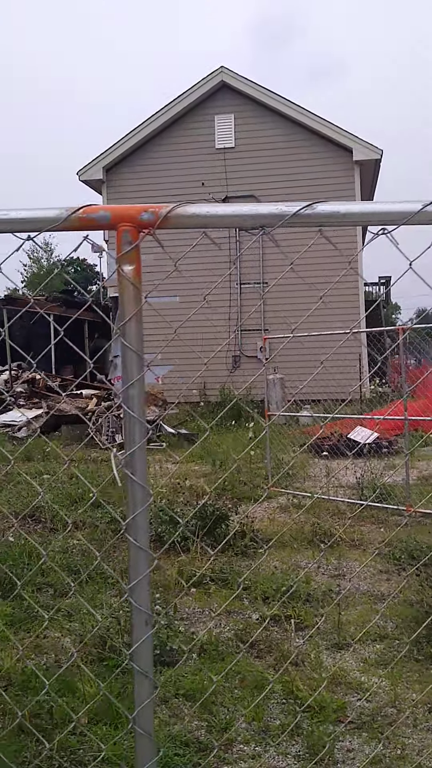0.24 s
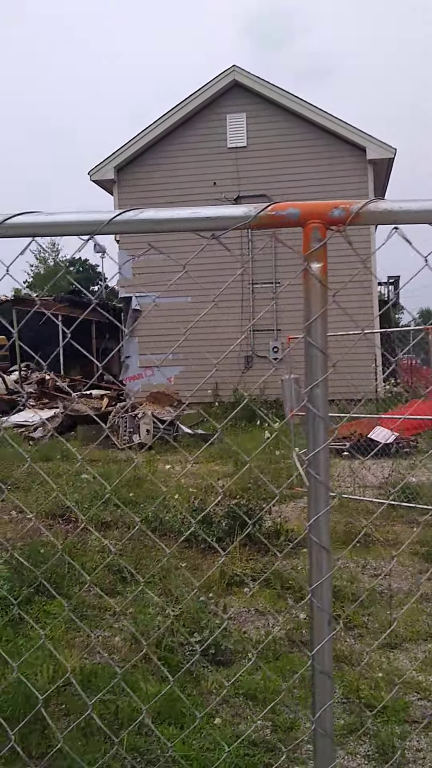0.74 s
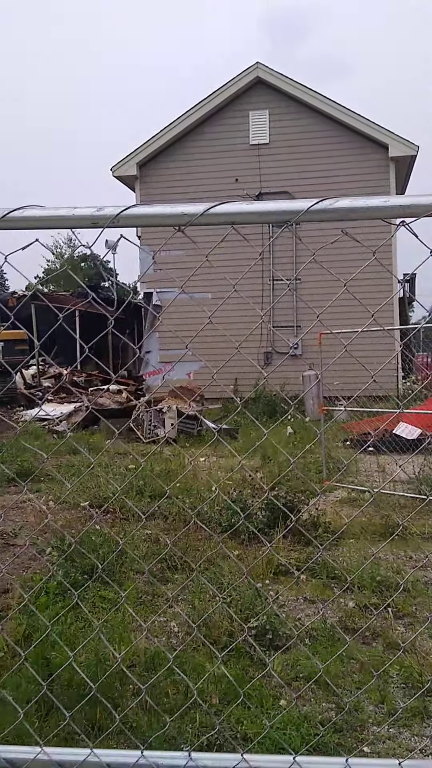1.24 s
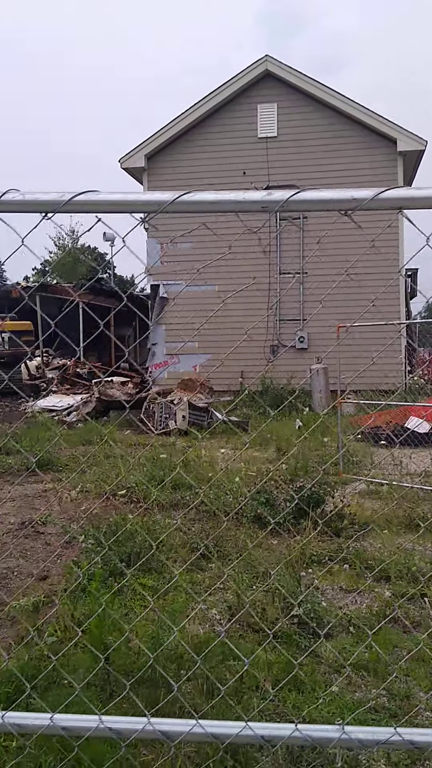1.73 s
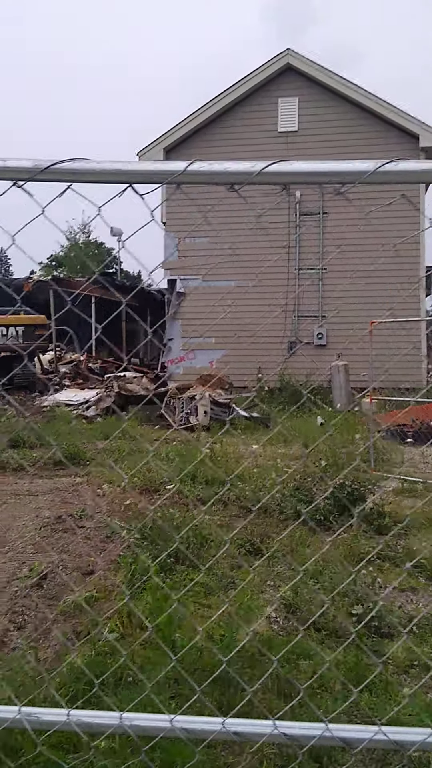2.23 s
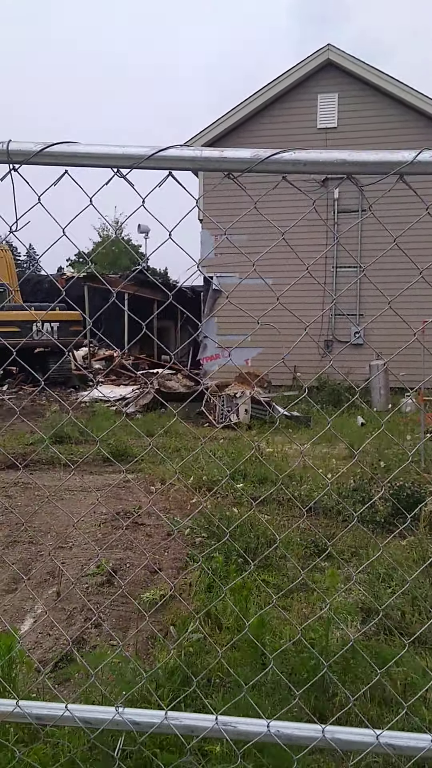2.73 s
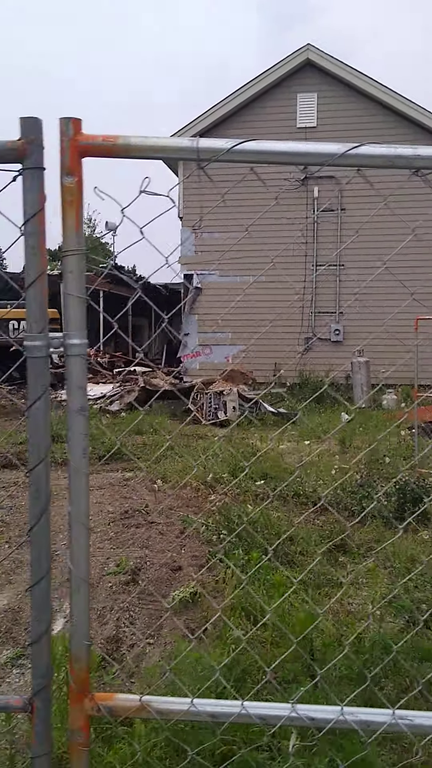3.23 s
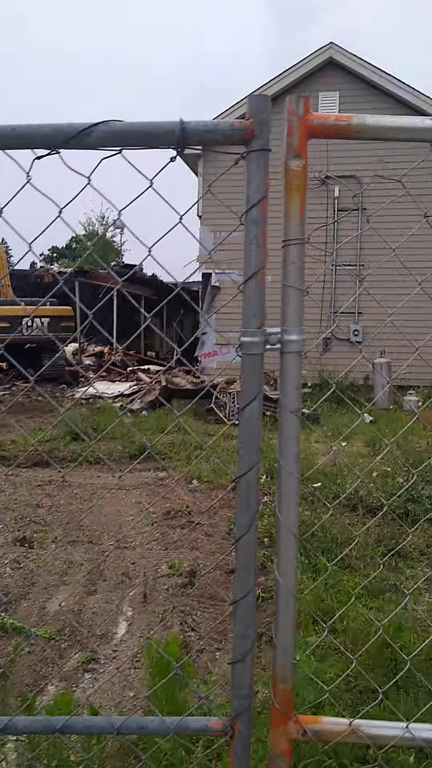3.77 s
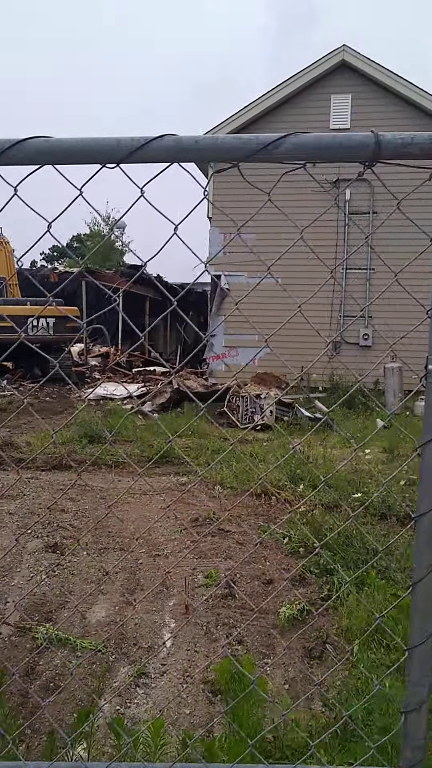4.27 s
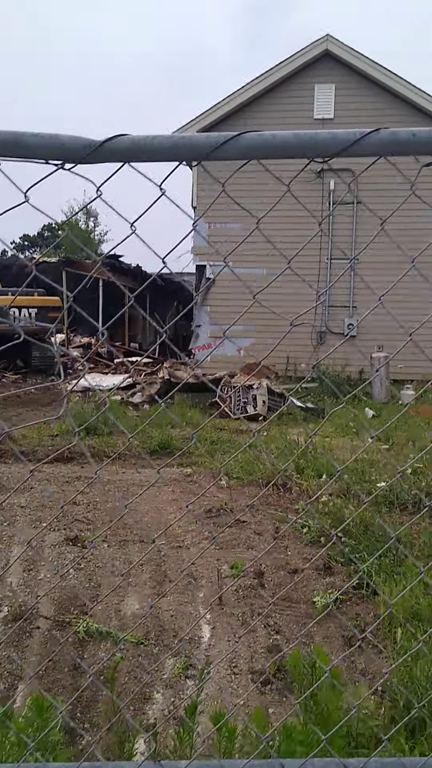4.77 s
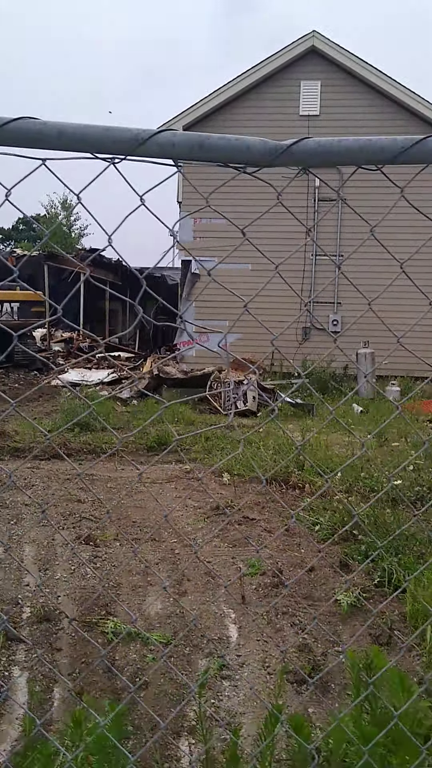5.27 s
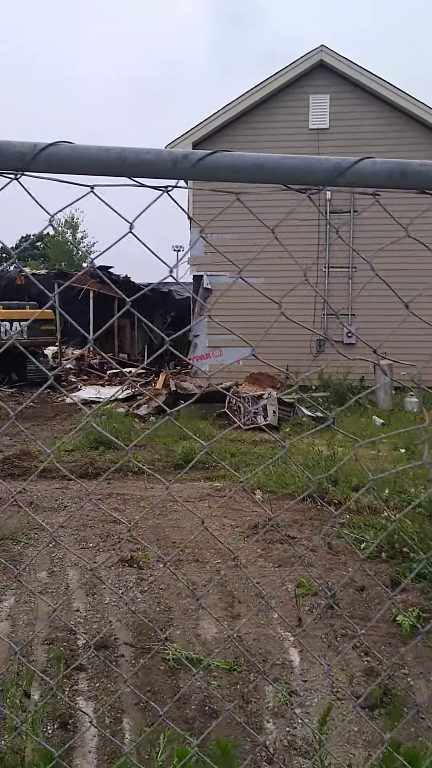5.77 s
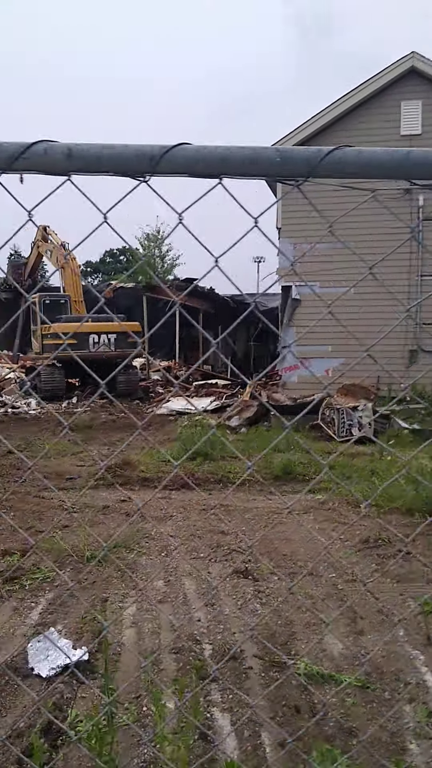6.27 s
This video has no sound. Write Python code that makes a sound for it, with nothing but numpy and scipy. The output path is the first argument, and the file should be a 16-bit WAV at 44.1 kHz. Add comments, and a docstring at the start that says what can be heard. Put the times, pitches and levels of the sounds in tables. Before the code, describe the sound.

Outdoors across a lot, a low diesel hums steadily while a wooden house is torn apart. Light metal clinks and knocks come first, then a dense splintering crash, a second heavy burst with deep thuds, and shorter cracks and clatters. A hydraulic whine and faint squeals enter later, before a final crunch. Handheld stereo microphone at a distance, with short echoes.

```python
"""Demolition of a wooden house

An excavator pulls down a house across an open lot. Rubble slides as dense trains of tiny snaps, boards
tear in bursts of snaps filtered by random resonances, timbers thud and the steel bucket knocks as decaying
modes, and light metal taps beat. Decaying echoes follow them. Beneath runs the diesel as a harmonic series,
with a thin hydraulic whine, squeals, a fluttering hiss on the right and a wash of distant machinery."""
import sys
import numpy as np
from scipy import signal
from scipy.fft import rfft, irfft, next_fast_len
from scipy.io import wavfile
from scipy.ndimage import uniform_filter1d

SR = 44100
rng = np.random.default_rng(int(sys.argv[2]) if len(sys.argv) > 2 else 0)


def store_wav(level_fs):
    """Save 16-bit WAV to argv[1]."""
    pcm = np.round(np.clip(np.atleast_2d(level_fs), -1, 1) * 32767)
    wavfile.write(sys.argv[1], SR, pcm.T.astype(np.int16))


N = 286738
TIME = np.arange(N) / SR
PADDED = next_fast_len(N, True)


def amp(db):
    """Decibel law: level to amplitude ratio."""
    return 10 ** (np.asarray(db) / 20)


def unit(x):
    """Normalisation to an rms of 1."""
    return x / np.sqrt(np.mean(x ** 2) + 1e-20)


def read(points, hz):
    """Linear interpolation of a table on a log-frequency axis."""
    f, value = np.transpose(points)
    return np.interp(np.log(hz + 1), np.log(f + 1), value)


def curves(rows):
    """Linear interpolation in time of each column of a table."""
    s, *columns = np.transpose(rows)
    return [np.interp(TIME, s, c) for c in columns]


def add(mix, s, sound):
    """Superposition: a sound joins the mix at time s."""
    part = mix[..., max(round(s * SR), 0):][..., :sound.shape[-1]]
    part += sound[..., :part.shape[-1]]


def bins(size):
    """Frequencies of a discrete real spectrum."""
    return np.fft.rfftfreq(size, 1 / SR)


def drift(rate_hz, size=8192):
    """Low-pass noise: a random fluctuation of rms 1, mostly slower than rate_hz."""
    hz = np.fft.rfftfreq(size, N / SR / size)
    lowpass = 1 / (1 + (hz / rate_hz) ** 4)
    slow = unit(irfft(rfft(rng.standard_normal(size)) * lowpass))
    return np.interp(TIME, np.linspace(0, N / SR, size), slow)


def noise(spectrum, channels=1):
    """Spectral shaping: Gaussian noise of rms 1 coloured by a table."""
    white = rfft(rng.standard_normal((channels, PADDED)))
    return unit(irfft(white * amp(read(spectrum, bins(PADDED))), PADDED)[:, :N])


def causal(db):
    """Minimum phase: the response of a body that rings only after it is struck."""
    log_gain = np.log(amp(np.maximum(db, -100)))
    circle = np.concatenate([log_gain, log_gain[-2:0:-1]])
    return np.exp(signal.hilbert(circle).conj())[:len(db)]


def band_level(gain, lo_hz, hi_hz):
    """Band power: level in dB that a filter leaves of unit noise between two frequencies."""
    hz = bins(2 * len(gain) - 2)
    inside = (hz > lo_hz) * (hz < hi_hz)
    return 10 * np.log10(np.mean(abs(gain) ** 2 * inside) + 1e-20)


def snaps(size, per_s, spread_db):
    """Poisson impulses: two trains of tiny fibre snaps, a few much larger than the rest."""
    height = amp(spread_db * np.minimum(rng.exponential(1, (2, size)), 4))
    sign = rng.choice([-1, 1], (2, size))
    return height * sign * (rng.random((2, size)) < per_s / SR)


# likeness of the two ports: f/Hz, correlation [0 to 1]
COHERENCE = [(100, 1), (400, .92), (900, .84), (2000, .84), (4000, .58), (7000, .42), (13000, .2)]
# spectral balance of the ports: f/Hz, left minus right level/dB
BALANCE = [(400, 0.5), (1000, 3.5), (1700, -4), (2800, -0.5), (3800, 6.5), (5000, 5.5), (8000, 2.5),
           (10000, 7.5), (13000, 9.5)]
LEFT_LEAD_S = .00009


def ports(pair):
    """Interchannel coherence: two signals share their bass; the left port leads slightly and is tilted."""
    hz, (a, b) = bins(PADDED), rfft(pair, PADDED)
    same = np.clip(read(COHERENCE, hz), 0, 1)
    shared, apart = a * np.sqrt((1 + same) / 2), b * np.sqrt((1 - same) / 2)
    lean = amp(read(BALANCE, hz) / 2)
    lag = np.exp(-2j * np.pi * hz * LEFT_LEAD_S)
    return irfft([(shared + apart) * lean, (shared - apart) / lean * lag], PADDED)[:, :N]


# slides of rubble under the bucket: start t/s, length t/s, starting level/dB (relative),
# treble re that level/dB (relative)
SLIDES = [(0, 0.0084, -42, -33), (0.12, 0.26, -49, -52), (0.568, 0.13, -33.5, -7), (0.645, 0.29, -34, -7),
          (1.513, 0.013, -37.5, 0), (1.593, 0.4, -45.5, 0), (1.866, 0.056, -35, -5),
          (2.521, 0.087, -40, -11.5), (2.786, 0.084, -40.5, -16), (3.085, 0.2, -38, -24),
          (3.358, 0.078, -39, -13.5), (3.458, 0.13, -44, -6.5), (3.812, 0.015, -36.5, -12),
          (3.973, 0.14, -40, -8), (4.741, 0.05, -40, -27), (5.24, 0.056, -46.5, -45),
          (5.755, 0.12, -44, -14.5), (5.879, 0.037, -38, -4), (6.041, .12, -48.5, -14.5)]
# a slide starts quickly, slackens, then stops; dull scraps trickle on
SLIDE_ATTACK_S, SLIDE_SAG_DB_PER_S, SLIDE_STOP_DB_PER_S = 0.015, 10, 135
TRICKLE_DB, TRICKLE_DB_PER_S = -12.5, 37.5
DULLING_DB_PER_S = 41  # the splintering stops sooner than the tumbling


def slides():
    """Energy envelope: level and relative treble in dB through attack, sagging hold, release and trickle."""
    body, treble = np.full((2, N), 1e-10)
    t = TIME[:SR * 3 // 2]
    for start, length, db, treble_db in SLIDES:
        after = np.maximum(t - length, 0)
        held = np.minimum(t / SLIDE_ATTACK_S, 1) * amp(db - SLIDE_SAG_DB_PER_S * (t - after))
        rush = held * amp(-SLIDE_STOP_DB_PER_S * after)
        trickle = held * amp(TRICKLE_DB - TRICKLE_DB_PER_S * after)
        add(body, start, rush ** 2 + trickle ** 2)
        add(treble, start, (rush * amp(treble_db - DULLING_DB_PER_S * after)) ** 2)
    return 10 * np.log10(body), 10 * np.log10(treble / body)


# spectrum of breaking wood, for fragments and boards: f/Hz, relative level/dB per Hz
WOOD = [(150, -47), (280, -30.5), (450, -18), (560, -12), (660, -30.5), (900, -4), (1400, 2.5), (2100, 5.5),
        (3000, 2), (4200, -2.5), (6500, -9.5), (10400, -34), (15500, -60.5)]
USUAL_SLIDE_DB = -37  # slide level from which the bass of fragments and boards is reckoned


def crumble(db, treble, level_db=-5.0, treble_db=-1.0, patch_db=6, clump_db=0.8,
            lumps_db=-15, lumps_per_db=3.0):
    """Granular noise: countless fragments fall in clumps, in patches of varied pitch; big slides add bass."""
    hz, _, z = signal.stft(snaps(N, per_s=5000, spread_db=3.5), SR, nperseg=512)
    patches = uniform_filter1d(rng.standard_normal(z.shape[1:]), size=3, axis=0)
    patches = unit(uniform_filter1d(patches, size=5, axis=1))
    z = z * amp(read(WOOD, hz)[:, None] + patch_db * np.minimum(patches, 2))
    # high-pass masks split the fragments into four size bands
    small, fine, finest = (1 / (1 + (edge_hz / (hz[:, None] + 1)) ** 8) for edge_hz in (950, 4600, 10000))
    masks = (1 - small, small - fine, fine - finest, finest)
    lumps, chunks, grit, dust = (
        unit(signal.istft(z * mask, SR, nperseg=512)[1][:, :N]) for mask in masks)
    deep = amp(lumps_db + lumps_per_db * (db - USUAL_SLIDE_DB))
    bright = amp(treble + treble_db)
    # the top octave only escapes from exposed rubble
    sizes = deep * lumps + chunks + bright * (grit + 1.6 * np.minimum(bright, 1) * dust)
    return amp(db + level_db + clump_db * drift(23.0)) * sizes


# boards breaking loudly: t/s, nominal level/dB, nominal splinter treble re level/dB
CRACKS = [(.592, -30.5, -29), (.615, -29.5, -26), (.625, -28.5, -18), (.6518, -25.5, 2), (.662, -23, -21),
          (.684, -29.5, 3.5), (.697, -32, -18), (.745, -26, 1), (.7642, -31, 3.5), (.779, -26, -12),
          (.8179, -29, -11), (.8664, -26, 0), (.905, -30.5, -22), (.977, -27.5, -9), (1.5173, -32.5, 3),
          (1.531, -23, -14), (1.556, -27.5, -22), (1.6182, -37.5, 9), (1.7035, -30.5, 0.5), (1.765, -34, 3),
          (1.8148, -37, 9), (1.866, -26, 2.5), (1.8873, -23.5, 2.5), (1.9186, -24.5, -9), (1.94, -33, -16),
          (1.968, -34, -21), (1.994, -29.5, -10), (2.012, -30.5, -33), (2.365, -31, -67), (2.42, -38, -24),
          (2.5353, -24.5, -11), (2.5626, -25.5, -23), (2.718, -31.5, -36), (2.7702, -28, -10),
          (2.8126, -31, -10), (2.9879, -34, -3.5), (3.116, -30.5, -8.5), (3.136, -29.5, -14),
          (3.163, -22.5, -7), (3.195, -36, -9), (3.25, -32.5, -12), (3.368, -36, -11), (3.41, -31.5, -12),
          (3.4715, -24.5, -1.5), (3.487, -27, -2.5), (3.5105, -29.5, -3.5), (3.538, -28, -4.5),
          (3.836, -31.5, -11), (3.91, -24.5, -3.5), (3.961, -31.5, -5), (3.984, -29.5, -6),
          (4.0093, -24, -0.5), (4.035, -29.5, -23), (4.098, -28.5, -6), (4.39, -33.5, -36.5),
          (4.564, -26.5, -7.5), (4.785, -42, -33), (5.8, -32, -36), (5.848, -50, 8.5), (5.877, -27.5, -18),
          (5.897, -22, -10), (5.9317, -25, -17), (6.008, -32, -15)]
LOW_END_DB, LOW_END_PER_DB = -12.5, 3.5  # the bigger the slide, the deeper its boards
FRACTURE_S, SMALL_FRACTURE_S = 0.011, 0.0047  # decay time of the tearing of a board and a lath


def cracks(rows, slide_db, fracture_s, ring_db, level_db=0, treble_db=0, rise_s=0.003, size=8192):
    """Source and filter: a dying run of snaps excites each board's random resonances; buried ones are dull."""
    out, hz, t = np.zeros((2, N)), bins(size), np.arange(size) / SR
    wood = read(WOOD, hz)
    wood = wood - band_level(amp(wood), 1000, 4500)
    usual_treble = band_level(amp(wood), 5000, 15000)
    usual_low = band_level(amp(wood), 400, 1000)
    # how strongly each frequency follows the treble and the bass settings
    treble_part = read([(3400, 0.0017), (6500, 0.67), (14000, 2.65)], hz)
    low_part = read([(850, 0.48), (1400, 0.011)], hz)
    force = np.exp(-t / fracture_s) * (1 - np.exp(-t / rise_s))
    for s, db, treble in rows:
        slide_peak = slide_db[round(s * SR):][:size // 4].max()
        low = LOW_END_DB + LOW_END_PER_DB * (slide_peak - USUAL_SLIDE_DB)
        tear = unit(snaps(size, per_s=4500, spread_db=4.5) * force) * np.sqrt(np.mean(force ** 2))
        ripple = signal.fftconvolve(rng.standard_normal(len(hz)), np.hanning(80), "same")
        ripple = ring_db * unit(ripple) + loose_pieces(hz)
        # resonances share out the energy
        ripple -= 10 * np.log10(uniform_filter1d(amp(ripple) ** 2, size=260))
        colour = wood + ripple + (treble + treble_db - usual_treble) * treble_part
        colour = colour + (low - usual_low) * low_part
        add(out, s, amp(db + level_db) * irfft(rfft(tear) * causal(colour)))
    return out


def loose_pieces(hz, peak_db=9, width_hz=26, count=22):
    """Lorentzian resonance: colour in dB of slats and sheet metal set ringing, with new modes each time."""
    modes = 1300 * 10 ** rng.random((count, 1))
    peaks = 1 / (1 + (2 * (hz - modes) / width_hz) ** 2)
    return 10 * np.log10(1 + amp(peak_db) ** 2 * peaks.sum(0))


STILL_DB = -54  # below this slide level the rubble is at rest
# laths snap at random inside the slides: level re the slide
SMALL_CRACKS_PER_S, SMALL_CRACK_DB, SMALL_CRACK_SPREAD_DB = 55, 5.5, 3.5


def small_cracks(slide_db, slide_treble):
    """Poisson process: random rows like those of CRACKS, following the slide's level and treble."""
    when, size = rng.random(N), rng.standard_normal(N)
    at = np.flatnonzero((when < SMALL_CRACKS_PER_S / SR) & (slide_db > STILL_DB))
    db = slide_db + SMALL_CRACK_DB + SMALL_CRACK_SPREAD_DB * np.minimum(size, 1)
    return [(i / SR, db[i], slide_treble[i]) for i in at]


# timber landing: t/s, nominal level/dB, lowest mode f/Hz, extra level of upper modes/dB
THUDS = [(.15, -38, 779, -8), (0.32, -29, 2570, -12), (.587, -27.5, 1030, -8), (.591, -21.5, 2220, -14),
         (.614, -25, 1080, -10), (.655, -32.5, 396, 4), (0.661, -28, 1020, -8), (0.669, -23, 1570, -12),
         (.671, -23.5, 904, -8), (0.696, -30, 919, -8), (.761, -31, 2300, -16), (.765, -29, 783, 4),
         (.778, -28.5, 958, -8), (.875, -42.5, 403, 12), (1.01, -40.5, 544, 4), (1.518, -22, 193.5, 0.5),
         (1.538, -29, 167, -5), (1.555, -24.5, 1378, -10), (1.555, -30.5, 243, -1), (1.546, -23, 471.4, 0),
         (1.572, -27, 549, 0), (1.633, -36.5, 504, 5), (1.759, -45.5, 535, 17), (1.886, -24.5, 930, -15),
         (1.89, -19.5, 1347, -12), (1.912, -21.5, 1620, -12), (2.563, -24, 1047, -18),
         (2.565, -20, 2860, -18), (2.772, -17, 3387, -18), (2.813, -25, 716, -29.5),
         (2.816, -30.5, 586, -26), (2.99, -37, 967, -1), (3.373, -32, 2540, -12.5), (3.473, -20, 2264, -10),
         (3.837, -26, 3454, -24), (3.911, -23, 2067, -12), (4.01, -29, 1980, -10), (4.066, -24, 1286, -23),
         (4.099, -20, 1346, -53), (4.701, -36, 1030, -6), (5.209, -37, 800, -1.5), (5.225, -34.5, 551, -7),
         (5.242, -21, 1250, -29), (5.28, -35, 1205, -1), (5.286, -34, 3550, -24.5),
         (5.856, -32.5, 436, -30), (5.85, -30.5, 313, -36), (5.898, -33, 425, -17)]
# bending modes: f re the lowest mode [ratio], relative level/dB
TIMBER_MODES = [(1, 2), (1.27, -23.5), (2.42, 0.5), (2.75, -31), (5.2, -26)]
RING_S, RING_AT_HZ, RING_SLOPE = 0.06, 480, 0.34  # t60 for this lowest mode; smaller pieces ring shorter
BOUNCE_S, BOUNCE_LOSS_DB = 0.027, 13.5  # at RING_AT_HZ; a lighter piece loses more at each bounce
RATTLE = .3  # chatter against the pile, relative to the direct ring


def thuds(slide_db, level_db=0, rise_s=0.0028, bounce_count=3):
    """Modal synthesis: timbers land, bounce and ring in decaying bending modes, chattering on the pile."""
    out, t = np.zeros(N), np.arange(SR // 4) / SR
    for s, db, hz, upper_db in THUDS + strays(slide_db):
        lightness = (hz / RING_AT_HZ) ** RING_SLOPE
        t60 = RING_S / lightness
        ring = np.zeros(len(t))
        for ratio, mode_db in TIMBER_MODES:
            decay_db = mode_db + upper_db * (ratio > 1.1) - 60 * t * np.sqrt(ratio) / t60
            ring += amp(decay_db) * np.sin(2 * np.pi * hz * ratio * t)
        chatter = rng.standard_normal(len(t)) * np.exp(-t / 0.045)
        ring = ring + RATTLE * signal.fftconvolve(ring, chatter / np.linalg.norm(chatter))[:len(t)]
        # little sound leaves a piece below its lowest mode
        radiation = signal.butter(4, .72 * hz, "highpass", fs=SR, output="sos")
        blow = signal.sosfilt(radiation, ring * (1 - np.exp(-t / rise_s)))
        for bounce, uneven in enumerate(rng.uniform(-.1, .1, bounce_count + 1)):
            bounce_db = db + level_db - bounce * BOUNCE_LOSS_DB * lightness
            add(out, s + BOUNCE_S * bounce * (1 + uneven), amp(bounce_db) * blow)
    return out


# small offcuts topple at random; inside a slide many more do, at a level re the slide
STRAYS_PER_S, STRAY_DB, STRAY_LOW_HZ, STRAY_HIGH_HZ = 9, -38.5, 1302, 3296
TUMBLES_PER_S, TUMBLE_DB = 30, 10


def strays(slide_db, spread_db=4, upper_db=-14):
    """Inhomogeneous Poisson process: rows like those of THUDS, few at rest and a clatter in a slide."""
    when, size, pitch = rng.random((3, N))
    per_s = np.where(slide_db > STILL_DB, TUMBLES_PER_S, STRAYS_PER_S)
    db = np.maximum(STRAY_DB, slide_db + TUMBLE_DB) + spread_db * (2 * size - 1)
    hz = STRAY_LOW_HZ * (STRAY_HIGH_HZ / STRAY_LOW_HZ) ** pitch
    return [(i / SR, db[i], hz[i], upper_db) for i in np.flatnonzero(when < per_s / SR)]


# knocks of the steel bucket: t/s, relative level/dB
KNOCKS = [(0.153, -2.5), (.19, -7.5), (0.319, -1), (1.141, 2), (1.168, 3), (1.251, -0.5), (2.154, -2.5),
          (4.458, -3), (4.874, -12), (5.285, -8), (5.408, -2)]
# modes of the bucket: f/Hz, relative level/dB, t60/s
BUCKET_MODES = [(1200, -18.5, 0.24), (1610, -9, 0.052), (1753, -1, 0.039), (1846, 0.5, 0.019),
                (2070, -4, 0.035), (2303, -5.5, 0.056), (2570, -24, 0.14), (2930, -16, 0.075),
                (3906, -11, 0.026), (4450, -18.5, 0.025)]


def knocks(level_db=-40, left_db=-2, scrape_s=0.02, size=16384):
    """Forced modal response: a short scrape on the pile rings the steel, slightly to the right."""
    out, t = np.zeros((2, N)), np.arange(size) / SR
    ring = sum(amp(db - 60 * t / t60) * np.sin(2 * np.pi * hz * t) for hz, db, t60 in BUCKET_MODES)
    band = signal.butter(4, [1100, 5000], "bandpass", fs=SR, output="sos")
    for s, db in KNOCKS:
        scrape = signal.sosfilt(band, rng.standard_normal(size) * np.exp(-t / scrape_s))
        blow = signal.fftconvolve(ring, scrape / np.linalg.norm(scrape))[:size]
        add(out, s, amp(level_db + db) * blow)
    return out * amp([[left_db], [0]])


# light metal taps: t/s, relative level/dB
CLINKS = [(0.002, -21.5), (0.123, -8.5), (.195, -21.5), (0.293, 1), (0.402, -14.5), (2.987, -10)]
# modes of the tapped metal: nominal f/Hz, relative level/dB, t60/s
TAP_MODES = [(3130, -1.5, 0.13), (4243, 0, 0.15), (5130, -8, 0.14), (6560, 6, 0.039), (7230, -6, 0.11),
             (8920, -4.5, .1), (9920, -12.5, 0.22), (12060, -9, 0.16), (15300, -12, 0.18)]


def clinks(level_db=-39.5, beat_hz=45, contact_s=0.0035, uneven_db=3):
    """Beating modes: a brief chatter rings detuned pairs, with levels that vary with the spot tapped."""
    out, t = np.zeros((2, N)), np.arange(SR // 2) / SR
    for s, db in CLINKS:
        ring = np.zeros((2, len(t)))
        for hz, mode_db, t60 in TAP_MODES:
            decay = amp(mode_db + uneven_db * rng.uniform(-1.2, 1) - 60 * t / t60)
            pair_hz = hz + beat_hz * rng.standard_normal((2, 2, 1))
            ring += (decay * np.sin(2 * np.pi * pair_hz * t)).mean(1)
        chatter = rng.standard_normal((2, len(t))) * np.exp(-t / contact_s)
        tap = signal.fftconvolve(ring, chatter / np.linalg.norm(chatter[0]), axes=1)
        add(out, s, amp(level_db + db) * tap)
    return out


# decay of the echoes: f/Hz, t60/s
ECHO_DECAY = [(200, 0.2), (800, 0.35), (2000, 0.69), (5500, 0.25), (12000, 0.21)]


def yard(x, gap_s=0.0054):
    """Diffuse reverberation: scattered echoes of walls and rubble, each band decaying at its own rate."""
    taps = rng.choice([-1., 1.], (2, SR)) * (rng.random((2, SR)) < 2500 / SR)
    hz, t, z = signal.stft(taps, SR, nperseg=256)
    decay = amp(-60 * t / read(ECHO_DECAY, hz)[:, None])
    tail = signal.istft(z * decay, SR, nperseg=256)[1]
    tail *= 1 - np.exp(-(np.arange(tail.shape[1]) / SR / gap_s) ** 2)
    return signal.fftconvolve(x, tail / np.linalg.norm(tail[0]), axes=1)[:, :N]


# diesel: t/s, mean firing rate f/Hz, firing tone level/dB, reference level of the overtones/dB
DIESEL = [(0, 100, -60, -68), (1.3, 101.5, -59, -64), (1.9, 100.9, -61, -68), (2.7, 101.7, -63.5, -70),
          (3.4, 98.95, -59.5, -66.5), (4.5, 98.7, -58.5, -68.5), (5.1, 97.27, -57.5, -70),
          (5.8, 98, -54, -66), (6.5, 96.87, -53, -69)]
# overtones: multiple of the six-cylinder cycle [ratio], level re the overtone reference/dB
ORDERS = [(7, -6), (8, -9), (9, -2), (10, -8), (11, -5), (12, -3), (13, -9), (14, -4), (15, -3), (18, -7),
          (24, -8)]
# a second, lower hum: mean f/Hz, level before its fade/dB
DRONE = [(58.8, -61.5), (117.6, -66)]


def engine():
    """Harmonic series: a firing tone, overtones from uneven cylinders, and a lower hum strongest at first."""
    hz, firing_db, overtone_db = curves(DIESEL)
    turns = np.cumsum(hz * (1 + .002 * drift(4))) / SR
    out = amp(firing_db + .6 * drift(5)) * np.sin(2 * np.pi * turns)
    for order, db in ORDERS:
        cycle = order * turns / 6
        out += amp(overtone_db + db + 2 * drift(6)) * np.sin(2 * np.pi * (cycle + rng.random()))
    fade_db = np.interp(TIME, [0, 1.7, 3.9, 4.6, 6.5], [2.0, -3.5, -1.5, -5.0, -3.5])
    for hum_hz, db in DRONE:
        hum_turns = np.cumsum(hum_hz * (1 + .007 * drift(3))) / SR
        out += amp(db + fade_db + drift(4)) * np.sin(2 * np.pi * hum_turns)
    return np.sqrt(2) * out  # levels are rms


def whistle(hz, width_hz):
    """Narrow-band noise: a fuzzy tone of rms 1 that wavers around a pitch curve and swells unevenly."""
    turn = 2 * np.pi * np.cumsum(hz * (1 + .004 * drift(12))) / SR
    swell = amp(2 * drift(12))
    return unit(swell * (drift(width_hz) * np.cos(turn) + drift(width_hz) * np.sin(turn)))


# hydraulic pump: t/s, mean pitch f/Hz, level before panning/dB
PUMP = [(0, 1186, -72), (2.9, 1212, -77), (3.4, 1218, -55.5), (4.45, 1194, -56.5), (4.85, 1252, -57),
        (5.35, 1227, -56), (5.6, 1252, -66), (6.5, 1226, -77)]
# thin squeals: start t/s, end t/s, start f/Hz, end f/Hz, fuzz width f/Hz,
# nominal level of the louder side/dB, left minus right level/dB
SQUEALS = [(1.22, 1.368, 3120, 3130, 80, -56, -1), (1.241, 1.411, 9470, 9580, 111.1, -65.5, 18),
           (4.455, 5.048, 9950, 10300, 161.5, -68.5, -25), (4.688, 5.808, 2593, 2670, 330, -53, -32),
           (4.74, 5.81, 3785, 3800, 69, -60, -13), (4.783, 5.089, 3940, 3900, 280.8, -61.5, -15),
           (5.218, 5.763, 4100, 4000, 80, -59.5, -27), (5.61, 5.77, 5200, 5290, 130, -66, -15),
           (6.269, 6.493, 4110, 3960, 109, -58, -31)]


def hydraulics(left_db=-18, right_db=9.0, width_hz=70, stutter_db=4.5):
    """Frequency-modulated narrow bands: a pump whine mostly to the right; thin squeals come and go."""
    hz, db = curves(PUMP)
    whine = amp(db) * whistle(hz, width_hz=width_hz) * amp([[left_db], [right_db]])
    for start, end, from_hz, to_hz, fuzz_hz, squeal_db, pan_db in SQUEALS:
        progress = np.clip((TIME - start) / (end - start), 0, 1)
        swell = np.sqrt(abs(np.sin(np.pi * progress)))
        swell = swell * amp(stutter_db * np.minimum(drift(6.6), 1))
        glide = np.interp(TIME, [start, end], [from_hz, to_hz])
        sides = amp(squeal_db + np.minimum([[pan_db], [-pan_db]], 0))
        whine += sides * swell * whistle(glide, width_hz=fuzz_hz)
    return whine


# distant machinery and air: f/Hz, relative level/dB per Hz
WASH = [(25, -13), (33, -13), (42, -5), (95, -4), (140, 0), (255, 1), (295, -10), (450, -12), (950, -12),
        (2000, -19), (3300, -19), (4200, -26), (11000, -30.5), (15500, -39)]
# narrow hiss: f/Hz, relative level/dB per Hz
HISS = [(1100, -41), (1450, -25), (1620, -48), (1820, 17), (2100, 18.5), (2350, 6.5), (2550, -14),
        (2900, -35), (3200, -29), (4500, -40)]
# tones inside the hiss: mean f/Hz
WHIR_HZ = (1953, 2096, 2258)


def background(hiss_db=-51.0, flutter_db=3.0, wash_db=-59, whir_db=-55.5, wander=0.011):
    """Filtered noise: a wide wash, and on the right a narrow fluttering hiss with wandering tones inside."""
    wash = amp(wash_db) * noise(WASH, channels=2)
    hiss = amp(hiss_db + flutter_db * drift(46)) * noise(HISS)
    speed = 1 + wander * drift(4)
    whir = amp(whir_db) * sum(whistle(hz * speed, width_hz=39) for hz in WHIR_HZ)
    return ports(wash) + (hiss + whir) * amp([[-32], [0]])


def scene(echo_db=-6.5, thud_echo_db=-11):
    """Linear superposition: debris with its echoes over the running machine."""
    machine = engine() + hydraulics() + background()
    slide_db, slide_treble = slides()
    heavy = ports(thuds(slide_db) * [[1], [0]]) + knocks()
    boards = cracks(CRACKS, slide_db, FRACTURE_S, ring_db=4.0)
    laths = cracks(small_cracks(slide_db, slide_treble), slide_db, SMALL_FRACTURE_S, ring_db=15.5)
    debris = clinks() + crumble(slide_db, slide_treble) + boards + laths
    echoes = amp(echo_db) * yard(debris) + amp(thud_echo_db) * yard(heavy)
    return ports(debris + echoes) + heavy + machine


EDGE_HZ = 15650  # upper band limit


def record(dry, threshold_db=-42.0, depth_db=-8):
    """Downward expansion: a suppressor lowers the left midrange while it is quiet; then the band limit."""
    left, right = dry
    band = signal.butter(3, [950, 3700], "bandpass", fs=SR, output="sos")
    mids = signal.sosfiltfilt(band, left)
    power = abs(uniform_filter1d(mids ** 2, size=1024))
    quiet = 1 / (1 + power / amp(threshold_db) ** 2)
    pair = np.array([left + mids * (amp(depth_db * quiet) - 1), right])
    lowpass = signal.firwin(511, EDGE_HZ, window=("kaiser", 9), fs=SR)
    return signal.oaconvolve(pair, lowpass[None], "same")


dry = scene()
out = record(dry)
store_wav(out)
```